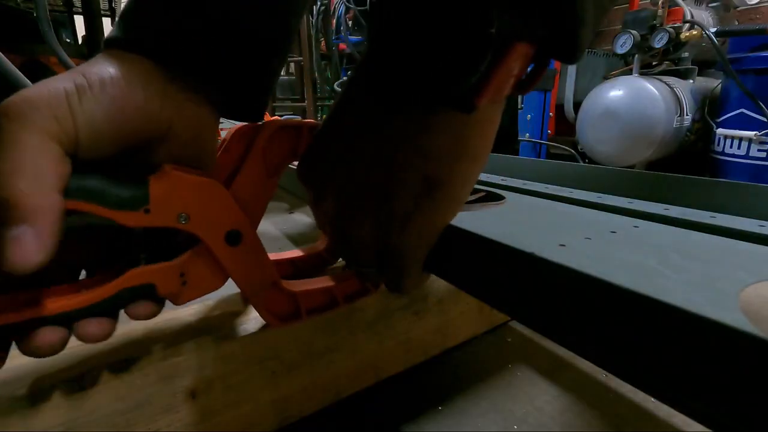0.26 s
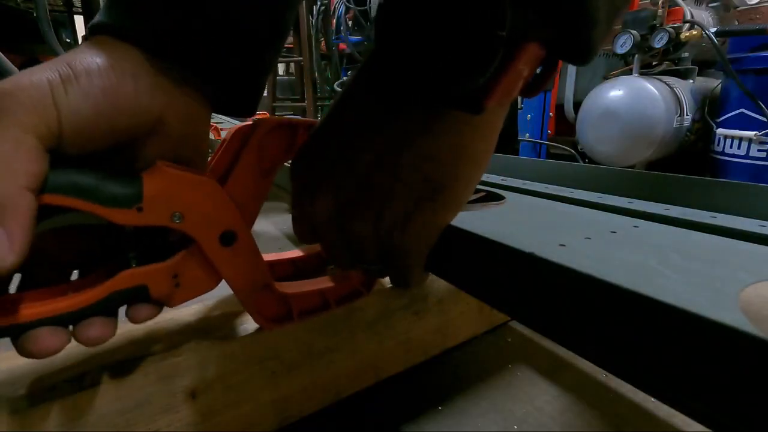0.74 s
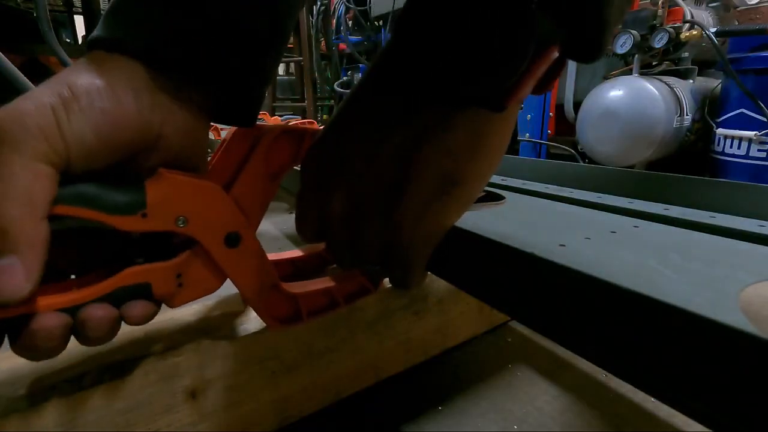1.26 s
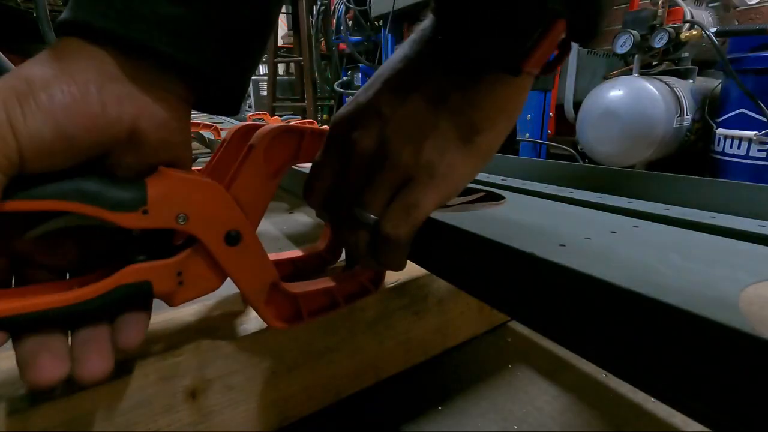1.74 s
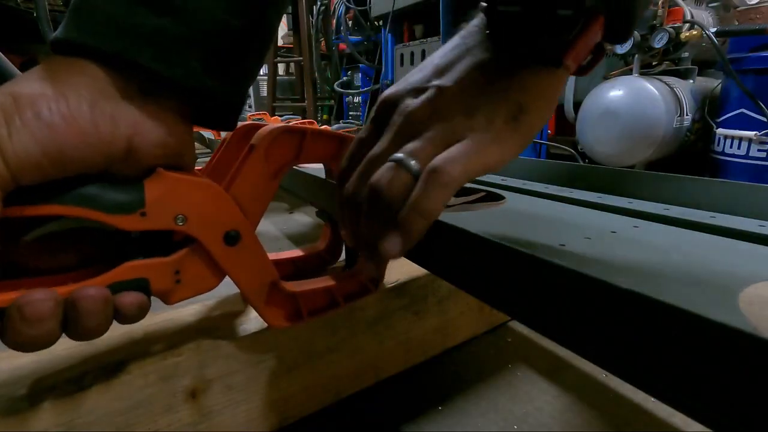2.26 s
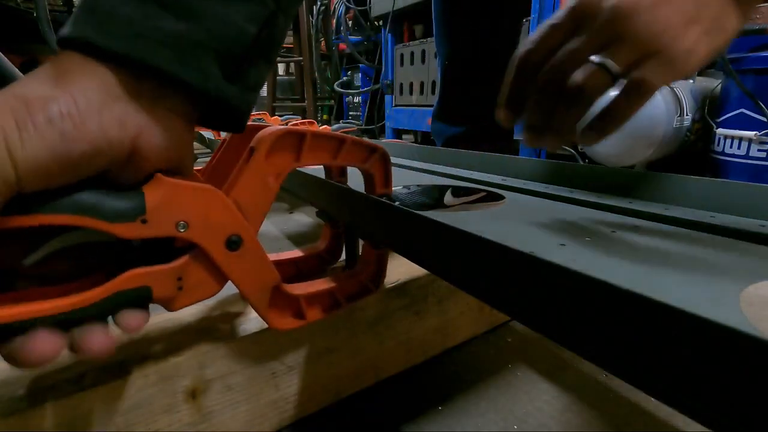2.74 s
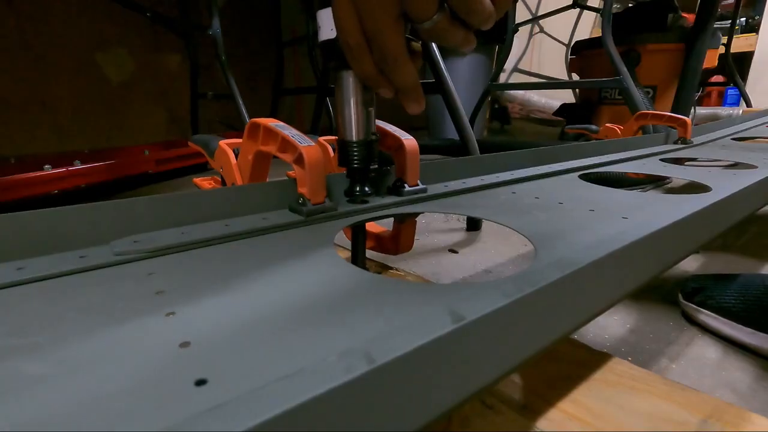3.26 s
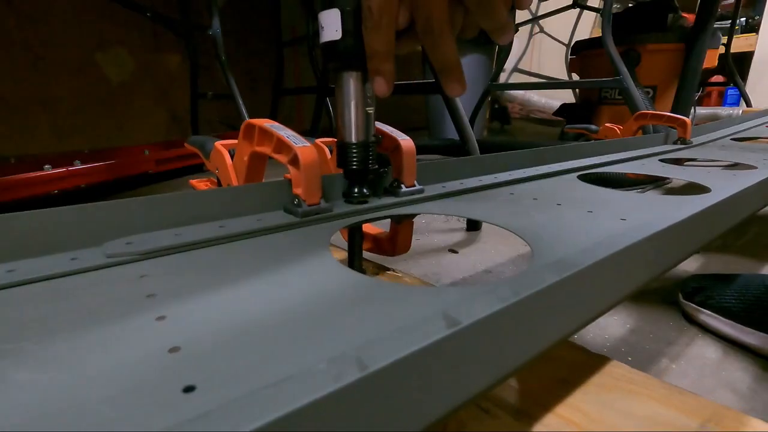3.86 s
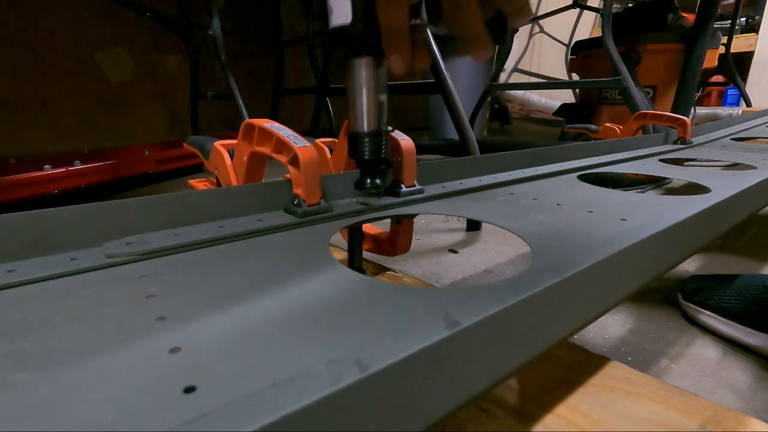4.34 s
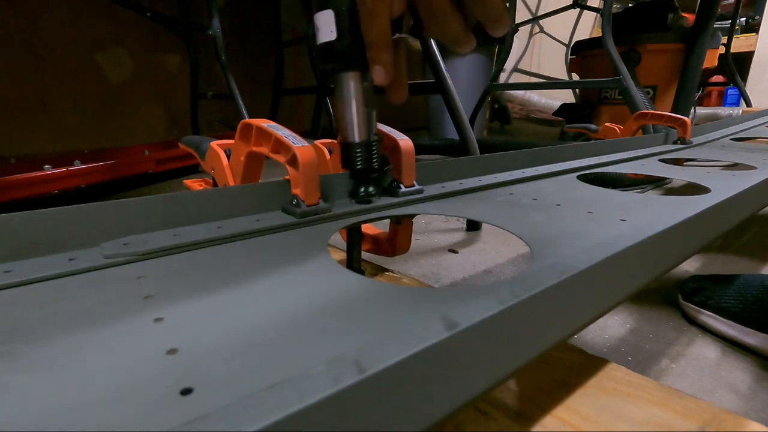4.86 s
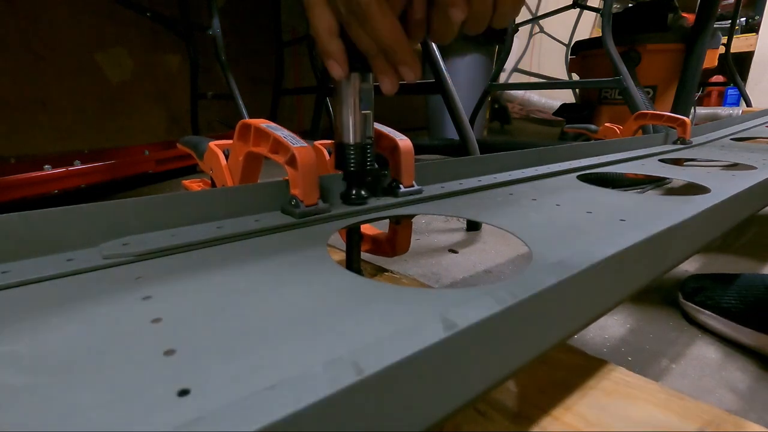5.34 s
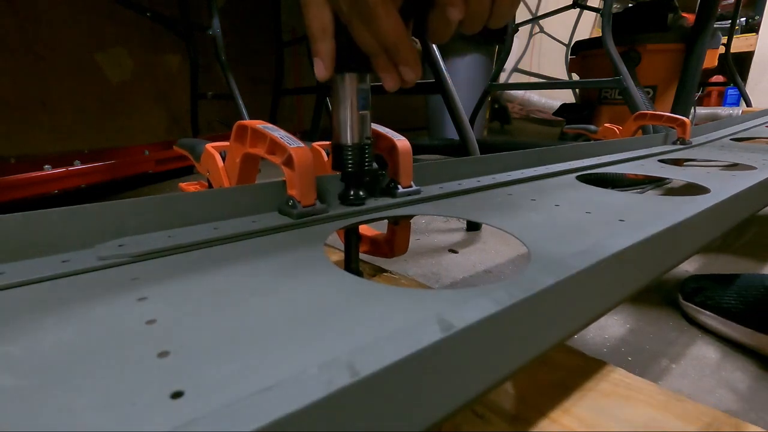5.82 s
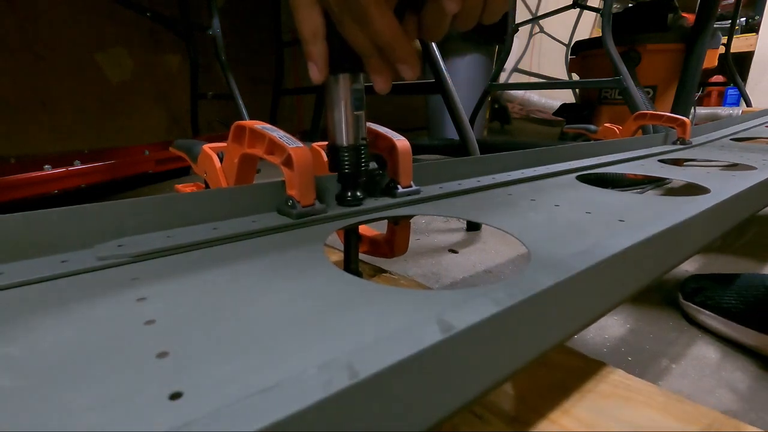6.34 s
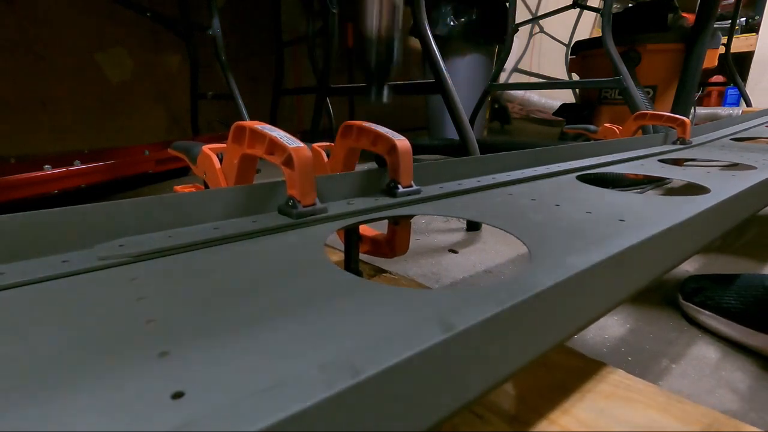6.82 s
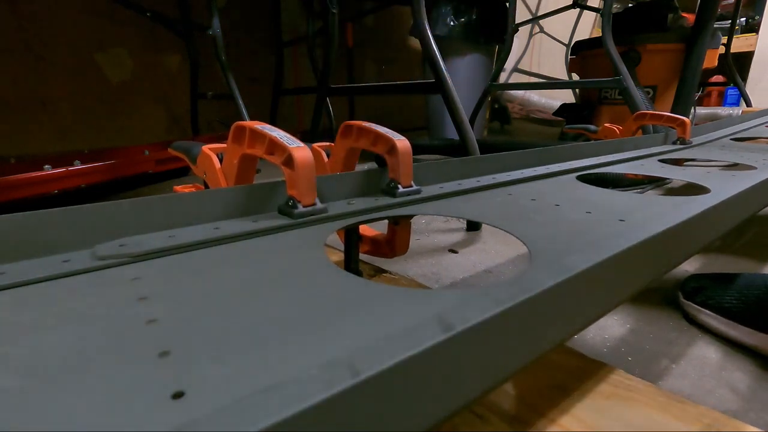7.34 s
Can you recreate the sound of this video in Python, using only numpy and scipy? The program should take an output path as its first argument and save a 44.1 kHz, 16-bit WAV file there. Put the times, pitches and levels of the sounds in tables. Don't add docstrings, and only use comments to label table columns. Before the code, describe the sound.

Plastic ratchet clamps click sharply shut on a metal beam, then an air rivet gun hammers five short, loud, hissing bursts in an echoing garage.

```python
import sys
import numpy as np
from scipy import signal
from scipy.fft import rfft, irfft, next_fast_len
from scipy.io import wavfile
from scipy.ndimage import uniform_filter1d

SR = 44100
rng = np.random.default_rng(int(sys.argv[2]) if len(sys.argv) > 2 else 0)


def persist_wave(psi):
    counts = np.round(np.clip(psi, -1, 1) * 32767).astype(np.int16)
    wavfile.write(sys.argv[1], SR, np.atleast_2d(counts).T)


def magnitude_from_level(level_db):
    exponent = np.asarray(level_db, float) / 20
    return 10 ** exponent


N = 334278

# pitch_hz, density_db (per Hz)
DRONE = [(12, -33), (20, -11.5), (54, -14), (81, -12.5), (116, -2.5), (200, -10), (242, -13.5),
         (337, -20.5), (443, -25.5), (809, -21), (1520, -28.5), (3560, -55.5), (6320, -64), (14000, -86.5)]
# pitch_hz, level_db
HUM_TONES = [(86.5, 3), (141, -12), (183, -5.5), (209, -8.5)]
# time_s, level_db
HUM_LEVEL = [(0.0, -47.5), (0.25, -46), (0.7, -36), (1.34, -37.5), (1.65, -37), (2.27, -37), (2.8, -42.5),
             (2.97, -61.5)]
# pitch_hz, density_db (per Hz)
RUMBLE = [(12, -26), (25, -5.5), (65, -3.5), (130, -4), (250, -38), (2000, -91.5)]
# start_s, level_db, lost_db (to the gain control after a burst)
SHOTS = [
    (0.0, -41, 0),
    (2.886, -41, -15.5),
    (3.681, -40.5, -13),
    (4.565, -44, -9),
    (5.325, -40, -12.5),
]

# start_s, length_s, level_db,
# swell_share (of the stroke)
RUBS = [(0.0, 0.1, -68.5, .5), (0.657, .17, -63.5, 0.31), (0.863, 0.2, -71.5, 0.13),
        (1.479, 0.32, -57.5, 0.73), (2.093, .16, -60, 0.64), (7.105, .32, -70, 0.34),
        (6.799, 0.82, -76, .15)]
# pitch_hz, density_db (per Hz)
CLOTH = [(1180, -33.5), (2000, -9), (3220, -4), (4880, -6), (5280, -6), (7060, -12), (10500, -29.5),
         (13000, -29)]
# start_s, level_db, pitch_hz, ring_db (over the tick)
TICKS = [(0.027, -44.5, 2410, 5.5), (0.075, -44.5, 4170, -1.5), (0.9028, -51, 2310, 10),
         (0.979, -48.5, 2420, 3), (1.6098, -46, 2300, -7), (1.8796, -58, 2680, -14.5),
         (2.805, -58.5, 3240, 7), (3.4023, -51, 3370, 4.5), (4.3629, -28, 2647, -12),
         (6.063, -54.5, 2570, -12), (6.241, -51, 3790, -10.5), (7.1919, -48.5, 3400, -4),
         (7.263, -53.5, 4800, 1), (7.3251, -48, 4190, -8), (7.3347, -45, 5230, -3)]

# start_s, level_db, pitch_hz, treble_db (over the level), knock_db
TEETH = [(0.2173, -1, 1856, -14, -40.5), (0.2244, -6.5, 1756, -6.5, -41.5), (0.2303, -7, 1707, -10, -46),
         (0.2394, -15, 1657, -10.5, -32), (0.2623, -9, 2004, -4, -72.5), (0.2704, -7.5, 1643, -25, -61.5),
         (0.2745, -2, 1842, -7.5, -42.5), (0.2955, -10.5, 1790, -9.5, -16.5),
         (1.2040, -1, 1900, -11.5, -5.5), (1.2145, -8.5, 1725, -8.5, -47.5), (1.3393, -3, 1842, -9.5, -55),
         (2.2322, -4, 1696, -12.5, -5.5), (2.4112, -2.5, 1797, -6.5, -51.5),
         (2.6446, -7.5, 3168, -10, -5.5), (2.85, -51, 1700, -14.5, -31)]
# pitch_hz, density_db (per Hz)
PLASTIC = [(290, -43.5), (500, -24), (1120, -21), (1750, -5), (2230, 7), (5830, -13.5), (7560, -5.5),
           (9510, -17.5), (10500, -27.5), (13400, -15.5), (15500, -42.5)]
# pitch_hz, density_db (per Hz)
FIZZ = [(3000, -26.5), (5000, -9.5), (8000, -20.5), (15000, -42.5)]
# pitch_hz, width_hz, level_db
KNOCK = [(196.7, 45, 5.0), (310, 21, -4.5), (476, 13, -8.0), (740, 59, -10)]
# pitch_hz, level_db
CUT_CLICK = [(100, 0), (1000, -9.5), (15500, -13)]

# start_s (valve opens), pop_db, air_db (exhaust), shade_db (treble past the gun's body)
PULLS = [(3.017, -6, -1.5, -2.5), (3.853, -6, 2, -1), (4.708, -9.5, 3.5, 1), (5.439, -7, -0.5, 5.5),
         (6.372, -16, 0.5, -8.5)]
# first_s, last_s (full blows), dying_s (weak last blow)
BURSTS = [(3.0468, 3.1885, 3.2337), (3.8822, 4.0785, 4.118), (4.7384, 4.8803, 4.9217),
          (5.4682, 5.6087, 5.6529), (6.4005, 6.542, 6.5848)]
# blow_db, bare_db (crack over blow), ring_db (beam over blow), fall_db (by last blow)
FORCE = [(-7.5, 1, 1, -7.5), (-8.5, 2, -5, -7), (-7.5, 3.5, -4.5, -10), (-8.5, 2.5, -0.5, -10.5),
         (-11.5, 0.5, 0, 0)]
# pitch_hz, width_hz, level_db
STEEL = [(2540, 95, 4), (3010, 200, -2), (3480, 90, -1), (1590, 200, -6), (1970, 250, -8), (4940, 300, -8),
         (5930, 300, -8), (7170, 400, -13)]
# pitch_hz, width_hz, level_db
BEAM = [(1090, 60, 0), (1150, 55, -3), (1345, 80, -10), (865, 90, -14), (505, 80, -15)]
# pitch_hz, density_db (per Hz)
CRACK = [(290, -32.5), (500, -18.5), (1240, -5.5), (1900, -11), (2430, -19.5), (3010, -5), (3630, -18),
         (4310, -16.5), (6000, -17.5), (15500, -47)]
# pitch_hz, density_db (per Hz)
HISS = [(240, -27.5), (400, -0.5), (726, -3), (1240, -14.5), (2150, -22.5), (3570, -4), (4090, -10),
        (5070, -5), (7670, -12), (15500, -42.5)]
# pitch_hz, density_db (per Hz)
BUFFET = [(15, -21.0), (35, -3.5), (80, -2.5), (160, -6.5), (300, -20.0), (450, -31.5), (2000, -80)]
# pitch_hz, width_hz, level_db
FLANGE = [(1185.6, 17, -7.5), (1236, 11, -13), (1252, 29, -16)]

# pitch_hz, fade_s (time to fall 60 dB)
GARAGE = [(60, 0.57), (250, 0.64), (1000, 0.63), (3000, 0.51), (8000, 0.45), (15000, 0.23)]
# pitch_hz, level_db
WIDTH = [(60, -14), (400, -13), (2400, -13), (6000, -11), (10000, -9), (15000, -3)]
# start_s, end_s
WIDE = [(2.88, 3.5), (3.68, 4.45), (5.33, 5.95)]
# pitch_hz, kept_share (of loud patches)
KEPT = [(100, 0.036), (600, 0.038), (1500, 0.0083), (3500, .02), (5000, 0.18), (10000, .2), (12000, .8),
        (15000, .9)]

RUMBLE_DB = -10.5
RECOVER_DB_PER_S, SETTLE_DB, SETTLE_S = 5, -3, 0.35
RUB_EDGE_DB, RUB_HOLD_DB, RUB_HOLD = -13, -2.5, 0.7
SPLICE_DB = -49
STROKE_S, LATE_S = 0.0282, 0.0027
SEAT_S, SEAT_DB = 0.0102, -5
DYING_DB, DYING_SAG, UNEVEN_DB = -4.5, 0.55, 0.8
THUMP_DB, RETURN_DB, THUMP_SAG = 1.35, -3, 0.66
TICK_DB = -0.5
BACKSTOP_DB = -6.5
JANGLE_DB = -4.5
LEAK_S, LEAK_DB, SURGE_S, EMPTY_S = 0.0043, -23, 0.016, 0.064
HISS_DB, HISS_START_DB, HISS_SAG_DB, HISS_END_DB = -24.5, -2.5, -3.5, -17
GUST_DB, GUST_START_DB, GUST_SAG_DB, GUST_END_DB = -19, -9, -3.5, -34
EDGE_HZ = 15300


def evened(x):
    return x / np.sqrt(np.mean(x ** 2) + 1e-20)


def peaked(x, db):
    return magnitude_from_level(db) * x / abs(x).max()


def read(points, hz):
    f, value = np.transpose(points)
    return np.interp(np.log(hz + 1), np.log(f + 1), value)


def add(mix, s, sound):
    part = mix[round(s * SR):][:len(sound)]
    part += sound[:len(part)]


def level(shapes):
    t, out = np.arange(N) / SR, np.zeros(N)
    for times, db in shapes:
        out = np.maximum(out, magnitude_from_level(np.interp(t, times, db, -200, -200)))
    return uniform_filter1d(out, size=200)


def coloured(points, size=next_fast_len(N)):
    gain = magnitude_from_level(read(points, np.fft.rfftfreq(size, 1 / SR)))
    return evened(irfft(rfft(rng.standard_normal(size)) * gain, size))[:N]


def ring(x, modes):
    t = np.arange(SR // 8) / SR
    body = 0
    for hz, width, db in modes:
        body = body + magnitude_from_level(db) * np.exp(-np.pi * width * t) * np.sin(2 * np.pi * hz * t)
    return signal.fftconvolve(x, body)


def rattle(seconds, points):
    t = np.arange(2000) / SR
    return coloured(points, size=2000) * np.exp(-t / seconds) * np.minimum(t / 0.00041, 1)


def click(points):
    log_gain = np.log(magnitude_from_level(np.maximum(read(points, abs(np.fft.fftfreq(2048, 1 / SR))), -90)))
    return np.fft.ifft(np.exp(np.conj(signal.hilbert(log_gain)))).real[:2000]


def camera_gain():
    t = np.arange(N) / SR
    shots = np.transpose(SHOTS)
    cut, db, duck_db = shots[:, np.searchsorted(shots[0], t, "right") - 1]
    pulls = np.r_[-1, np.transpose(PULLS)[0]]
    pulled = pulls[np.searchsorted(pulls, t) - 1]
    lost_db = (pulled > cut) * np.minimum(duck_db + RECOVER_DB_PER_S * (t - pulled), 0)
    return uniform_filter1d(magnitude_from_level(db + lost_db + SETTLE_DB * np.exp(-t / SETTLE_S)), size=200)


def room():
    t = np.arange(N) / SR
    hum = np.zeros(N)
    for hz, db in HUM_TONES:
        wander = uniform_filter1d(rng.standard_normal((2, N)), size=3000)
        wander = evened(uniform_filter1d(wander, size=3000))
        hum += magnitude_from_level(db + 2.7 * wander[0]) * np.sin(2 * np.pi * hz * t + 0.9 * wander[1])
    machine = evened(hum) + magnitude_from_level(RUMBLE_DB) * coloured(RUMBLE)
    machine_level = level([np.transpose(HUM_LEVEL)]) * magnitude_from_level(1.0)
    return coloured(DRONE) * camera_gain() + machine * machine_level


def strokes():
    shapes = []
    for s, length, db, swell in RUBS:
        times = s + length * np.array([0, swell, swell + RUB_HOLD * (1 - swell), 1])
        shapes.append((times, db + np.array([RUB_EDGE_DB, 0, RUB_HOLD_DB, RUB_EDGE_DB])))
    return level(shapes)


def hands():
    out = np.zeros(N)
    for s, db, hz, ring_db in TICKS:
        tick = rattle(0.003, CLOTH)
        add(out, s, peaked(tick, db - 2.0))
        add(out, s, peaked(ring(tick[:60], [(hz, 110, 0)]), db + ring_db - 1.5))
    grains = magnitude_from_level(2.2 * evened(uniform_filter1d(rng.standard_normal(N), size=300)))
    return out + evened(coloured(CLOTH) * grains) * strokes()


def clamps():
    out, ticks = np.zeros((2, N))
    for s, db, hz, treble_db, knock_db in TEETH:
        snap = rattle(0.0015, PLASTIC)
        tilt = [(500, 1.5), (2000, 0.75), (4000, 1), (7000, treble_db + 4.5), (15500, treble_db - 19.0)]
        plastic_modes = [(hz, 350, 0), (1720, 300, -3), (3900, 400, -3)]
        add(ticks, s + 0.001, peaked(click(tilt), db + 0.5))
        add(out, s, peaked(snap, db - 2.5))
        add(out, s, peaked(ring(snap, plastic_modes), db - 6.0))
        add(out, s, peaked(rattle(0.0055, FIZZ), db + treble_db - 0.5))
        add(out, s + 0.0029, peaked(ring(snap, KNOCK), knock_db - 8))
    return out, ticks


def splices():
    out = np.zeros(N)
    for cut, _, _ in SHOTS[1:]:
        add(out, cut, peaked(click(CUT_CLICK), SPLICE_DB))
    return out


def air(db, start_db, sag_db, end_db):
    shape_db = db + np.array([start_db + LEAK_DB, start_db, 0, sag_db, sag_db + end_db])
    shapes = []
    for (s, _, air_db, _), (_, last, dying) in zip(PULLS, BURSTS):
        times = [s - LEAK_S, s, s + SURGE_S, last + STROKE_S / 2, dying + EMPTY_S]
        shapes.append((times, air_db + shape_db))
    return level(shapes)


def buffet():
    return magnitude_from_level(3.0) * coloured(BUFFET) * air(GUST_DB, GUST_START_DB, GUST_SAG_DB, GUST_END_DB)


def puff(hz, cycles):
    u = np.arange(round(cycles / hz * SR)) / SR * hz
    return -np.sin(2 * np.pi * u) * np.sin(np.pi * u / cycles) ** 2


def blows():
    rows = []
    for (first, last, dying), (db, bare_db, ring_db, fall_db) in zip(BURSTS, FORCE):
        u = np.linspace(0, 1, round((last - first) / STROKE_S) + 1)
        run = first + (last - first) * u - LATE_S * (u - u ** 5)
        s = np.r_[first - SEAT_S, run, dying]
        sag_db = np.r_[SEAT_DB, fall_db * u, DYING_SAG * fall_db + DYING_DB]
        odd_db = UNEVEN_DB * rng.standard_normal((len(s), 4)).T
        thump_db = db + THUMP_SAG * sag_db
        rows += zip(s, db + sag_db + 0.5 * odd_db[0], bare_db + 0 * s, ring_db + odd_db[1],
                    thump_db + THUMP_DB + odd_db[2], thump_db + RETURN_DB + 2 * odd_db[3])
    return rows


def piston_strike():
    chatter = magnitude_from_level(-22) * rattle(0.002, [(20, 0), (20000, 0)])[:400]
    chatter[4] += 1
    chatter[rng.integers(130, 170)] += 0.3
    return np.convolve(chatter, np.hanning(7))


def gun():
    clatter, rings, pushes, force = np.zeros((4, N))
    for s, pop_db, _, _ in PULLS:
        add(pushes, s, magnitude_from_level(pop_db + 5.5) * puff(239.6, 1.76))
        add(clatter, s + 0.0029, peaked(rattle(0.0033, CRACK), pop_db + TICK_DB + 2.5))
    for s, blow_db, bare_db, ring_db, thump_db, back_db in blows():
        strike = piston_strike()
        add(clatter, s, peaked(rattle(0.0034, CRACK), blow_db + bare_db + 4))
        add(rings, s, peaked(ring(strike, STEEL), blow_db + 7.0))
        add(rings, s + 0.0082, peaked(ring(strike[::-1], STEEL[:3]), blow_db + BACKSTOP_DB))
        add(rings, s + 0.001546, peaked(ring(strike, BEAM), blow_db + ring_db + 1))
        add(force, s, peaked(strike, blow_db))
        add(pushes, s + rng.normal(0.00034, 0.00018), magnitude_from_level(thump_db) * puff(165, 1.1))
        add(pushes, s + rng.normal(0.0125, 0.00047), magnitude_from_level(back_db) * puff(120, 1.1))
    flow = air(HISS_DB, HISS_START_DB, HISS_SAG_DB, HISS_END_DB)
    clatter += magnitude_from_level(-3.0) * coloured(HISS) * flow
    jangle = evened(ring(rng.standard_normal(N), STEEL[:3:2] + BEAM[:2])[:N])
    rings += magnitude_from_level(JANGLE_DB) * jangle * flow
    highpass = signal.butter(3, 10500, "high", fs=SR, output="sos")
    treble = signal.sosfiltfilt(highpass, clatter + rings)
    since, _, _, shade_db = np.transpose(PULLS)
    pull = np.searchsorted(since - 0.05, np.arange(N) / SR) - 1
    clatter -= treble * (1 - magnitude_from_level(shade_db)[pull])
    return clatter, rings, pushes, force


def garage(x, slower, bend):
    taps = np.zeros(SR)
    at = np.arange(200, SR - 20, 20) + rng.integers(0, 20, (SR - 201) // 20)
    taps[at] = rng.choice([-1., 1.], len(at))
    hz, t, z = signal.stft(taps, SR, nperseg=256)
    fade = magnitude_from_level(-60 * (t / slower / read(GARAGE, hz)[:, None]) ** bend)
    tail = signal.istft(z * fade, SR, nperseg=256)[1]
    return signal.fftconvolve(x, tail / np.linalg.norm(tail))[:N]


def free_flange(force):
    hit = (uniform_filter1d(abs(force), size=1600) > 1e-7).astype(float)
    pressed = uniform_filter1d(hit, size=500)
    flange = garage(magnitude_from_level(-16.5) * ring(force, FLANGE)[:N], slower=0.9, bend=1.7)
    return flange * (1 - 0.7 * pressed)


def widened(x):
    hz, t, z = signal.stft(x, SR, nperseg=256)
    turn = np.exp(2j * np.pi * rng.random(z.shape))
    side = signal.istft(z * turn * magnitude_from_level(read(WIDTH, hz) + 3)[:, None], SR, nperseg=256)[1][:N]
    hz, t, z = signal.stft(side, SR, nperseg=2048, noverlap=1024)
    band = (4.0 * np.log2(hz + 300)).astype(int)
    kept = rng.random((64, len(t)))[band] < read(KEPT, hz)[:, None]
    wide = sum((a < t) & (t < b) for a, b in WIDE) > 0
    loud = uniform_filter1d(abs(z), size=15, axis=0) > magnitude_from_level(-104)
    side = signal.istft(z * ((kept | wide) & loud), SR, nperseg=2048, noverlap=1024)[1][:N]
    return np.array([x + side, x - side])


def scene():
    clatter, rings, pushes, force = gun()
    clicks, ticks = clamps()
    small = hands()
    bench = garage(magnitude_from_level(-1.5) * ticks + magnitude_from_level(-7.5) * small, slower=0.91, bend=0.74)
    sent = magnitude_from_level(-9) * clatter + magnitude_from_level(-16) * rings + magnitude_from_level(-12) * pushes
    turn = 2 * np.pi * 7 * np.arange(N) / SR
    hall = garage(sent * np.sin(turn), slower=1.0, bend=1.53)
    hall += garage(sent * np.cos(turn), slower=0.98, bend=2.09)
    near = magnitude_from_level(0.5) * (clatter + rings + pushes) + buffet() + clicks + magnitude_from_level(-7.0) * ticks + small
    return widened(near + bench + hall + free_flange(force) + room() + splices())


def limited(x):
    power_db = 10 * np.log10(abs(uniform_filter1d((x ** 2).mean(0), size=600)) + 1e-12)
    fall = np.arange(N) * 55.0 / SR
    over_db = np.maximum(np.maximum.accumulate(power_db + fall) - fall - 3.0, 0)
    return x / magnitude_from_level(0.043 * uniform_filter1d(over_db, size=300))


def smeared(x, error_db):
    hz, t, z = signal.stft(x, SR, nperseg=2048, noverlap=1536)
    error = rng.standard_normal(z.shape[1:]) + 1j * rng.standard_normal(z.shape[1:])
    error = uniform_filter1d(error.real, size=2, axis=0) + 1j * uniform_filter1d(error.imag, size=4, axis=0)
    error *= magnitude_from_level(error_db) * np.clip(hz / 900, 0, 1)[:, None]
    return x + signal.istft(z * error, SR, nperseg=2048, noverlap=1536)[1][:, :N]


def top_cut(x):
    return signal.sosfilt(signal.butter(12, 15700, fs=SR, output="sos"), x)


def record(dry):
    held = smeared(limited(dry), error_db=-1.5)
    clipped = 1.26 * np.tanh(held / 1.537)
    lowpass = signal.butter(8, EDGE_HZ, fs=SR, output="sos")
    return top_cut(signal.sosfilt(lowpass, clipped))


dry = scene()
out = record(dry)
persist_wave(out)
```